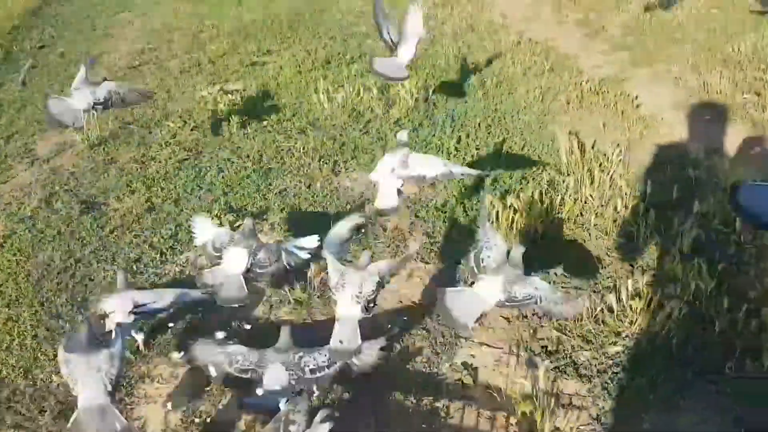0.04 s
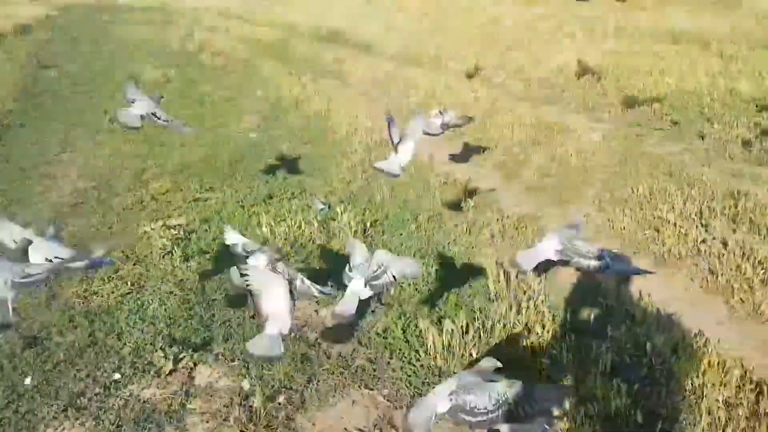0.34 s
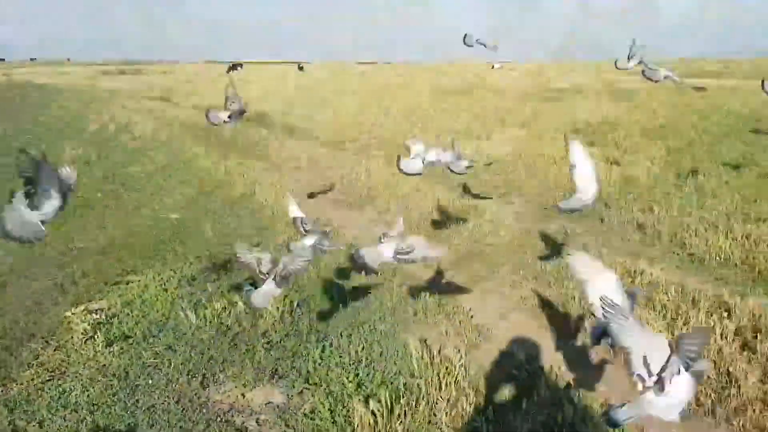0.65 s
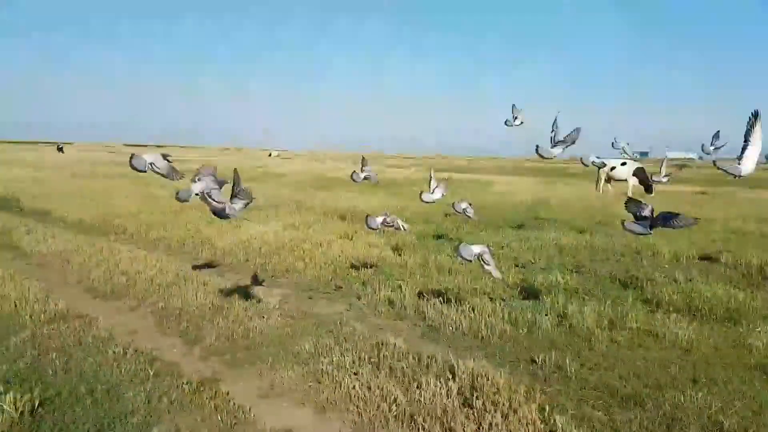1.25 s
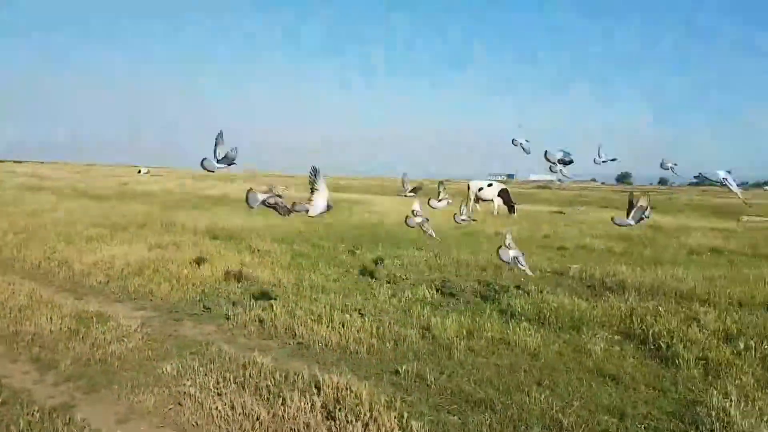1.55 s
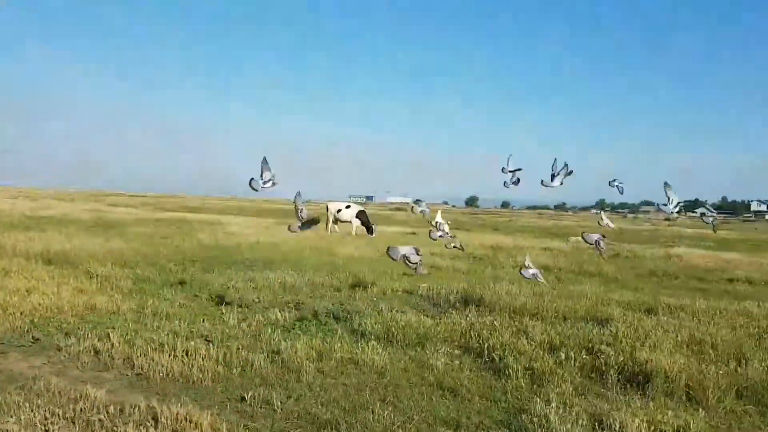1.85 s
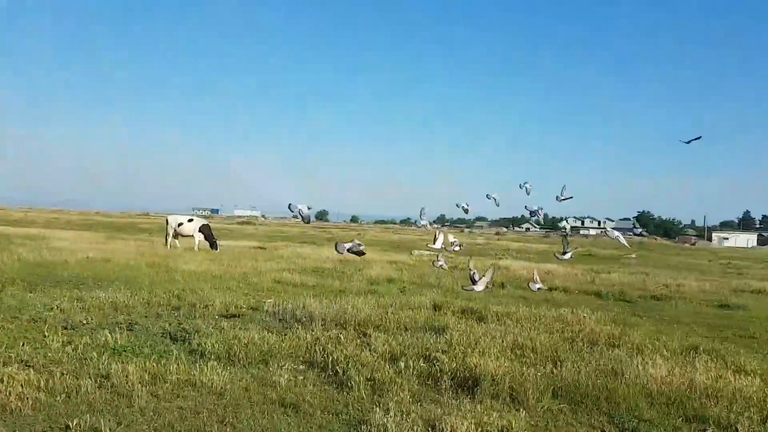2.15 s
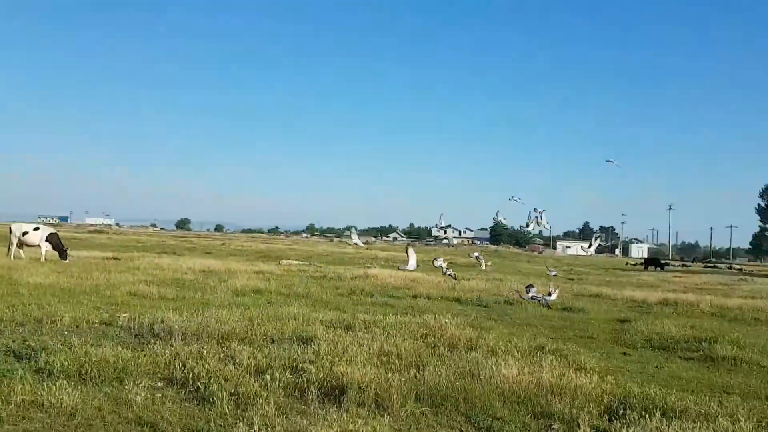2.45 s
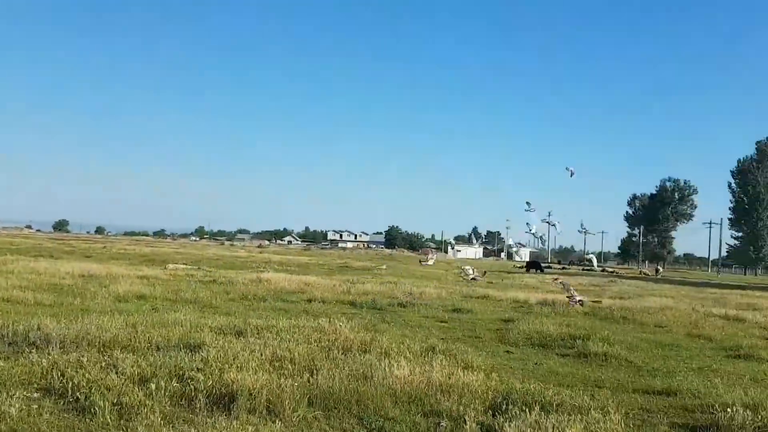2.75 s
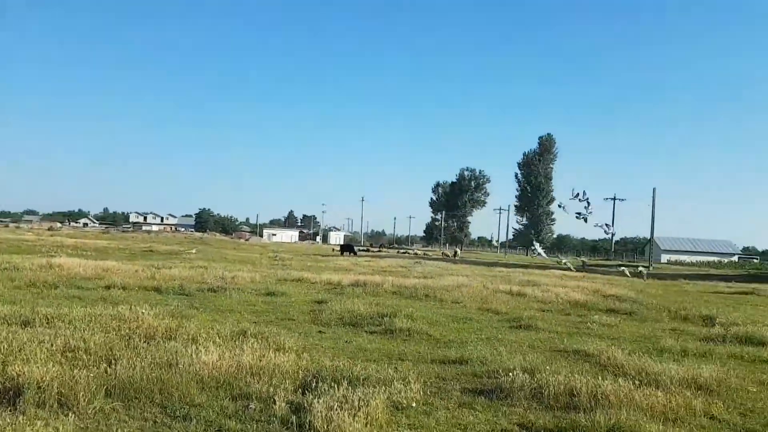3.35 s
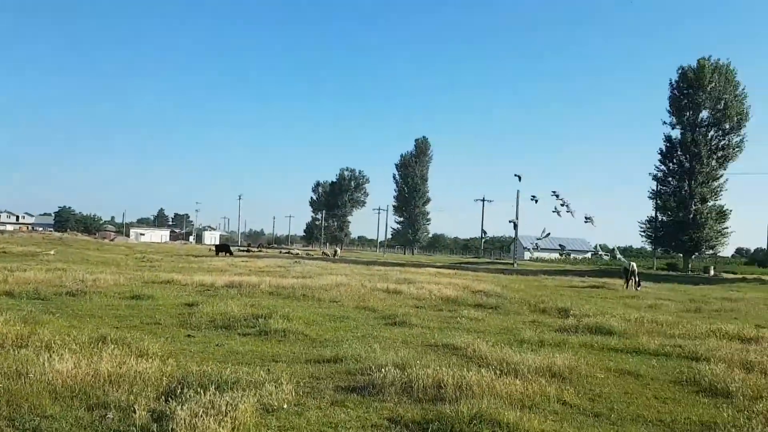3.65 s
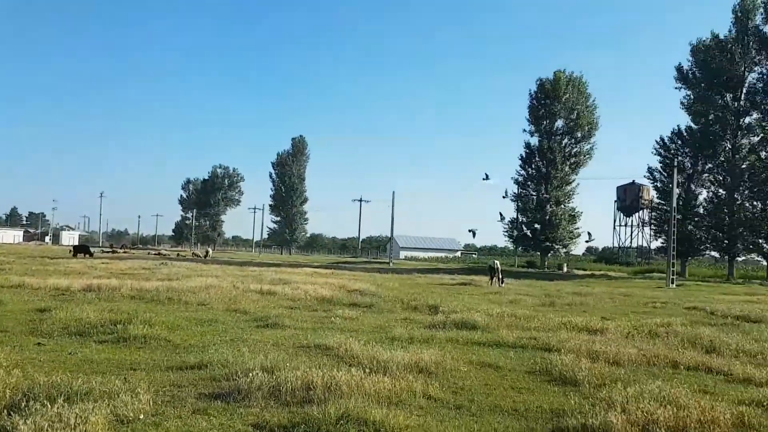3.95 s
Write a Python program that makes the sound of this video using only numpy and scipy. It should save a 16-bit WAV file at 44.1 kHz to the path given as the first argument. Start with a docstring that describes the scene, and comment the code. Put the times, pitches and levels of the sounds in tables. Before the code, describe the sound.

Pigeons burst into flight with loud wing flaps, then fade away over a quiet field.

```python
"""Pigeons taking flight

A flock bursts off the grass close by and flies away over an open field. Colliding wing tips clap,
downstrokes thump the air, and feathers rustle and faintly whistle, all fading with distance.
Light wind, a low rumble and a few far bird calls remain, with faint swishes, a chirp and a dull bump."""
import sys
import numpy as np
from scipy.fft import rfft, irfft, next_fast_len
from scipy.io import wavfile
from scipy.ndimage import uniform_filter1d, map_coordinates

SR = 44100
rng = np.random.default_rng(int(sys.argv[2]) if len(sys.argv) > 2 else 0)


def inscribe(sig):
    """Save sig as 16-bit PCM at rate SR to the path in sys.argv[1].

    A 1-D sig is mono; a 2-D sig holds one channel per row.
    Samples are clipped to [-1, 1] before scaling.
    """
    pcm = np.round(np.clip(np.atleast_2d(sig).T, -1, 1) * 32767)
    wavfile.write(sys.argv[1], SR, pcm.astype(np.int16))


N = 176400

# Spectrum of rubbing feathers. Each row: frequency in Hz, relative level in dB.
FEATHER_SPECTRUM = [(300, -43), (1000, -10.5), (2500, -4), (6500, -4), (8200, -7.5), (9600, -15),
                    (12800, -8), (15500, -19)]
# Coherence of wing noise. Each row: frequency in Hz, left-right correlation.
WING_COHERENCE = [(700, 0.98), (1500, 0.14), (4000, 0.22), (12000, 0)]


def amp(db):
    """Amplitude grows tenfold every 20 dB."""
    return 10 ** (np.asarray(db) / 20)


def unit(x):
    """Normalisation to an rms of 1."""
    return x / np.sqrt(np.mean(x ** 2) + 1e-20)


def along(points, hz):
    """Interpolation of (Hz, value) points on a logarithmic frequency axis."""
    f, v = np.transpose(points)
    return np.interp(np.log(hz + 1), np.log(f + 1), v)


def curves(rows):
    """Linear interpolation in time: one curve for each column after the first."""
    times, *columns = np.transpose(rows)
    return [np.interp(np.arange(N) / SR, times, column) for column in columns]


def wobble(rate):
    """Smooth random modulation: a spline through rate Gaussian knots a second."""
    knots = rng.standard_normal(int(N * rate / SR) + 4)
    return map_coordinates(knots, [np.arange(N) * rate / SR], mode="nearest")


def swell(rise_s, size=4096):
    """A critically damped envelope, peaking at 1 after rise_s."""
    u = np.arange(size) / SR / rise_s
    return u * np.exp(1 - u)


def filtered(x, response):
    """Linear filtering: the spectrum is multiplied by a frequency response."""
    n = x.shape[-1]
    padded = next_fast_len(n + 4096)
    return irfft(rfft(x, padded) * response(np.fft.rfftfreq(padded, 1 / SR)), padded)[..., :n]


def causal(gain):
    """Folding the cepstrum gives the minimum-phase response with this gain."""
    cepstrum = irfft(np.log(np.maximum(gain, 1e-6)))
    half = len(cepstrum) // 2
    cepstrum[1:half] *= 2
    cepstrum[half + 1:] = 0
    return np.exp(rfft(cepstrum))


def band(hz, centre_hz, width):
    """Gain of a steep-sided resonance; width is relative to the centre frequency."""
    return 1 / (1 + ((hz / centre_hz - centre_hz / (hz + 1)) / (2 * width)) ** 2)


def stereo_noise(spectrum, coherence):
    """Partly coherent noise of rms 1: the ratio of mid to side sets the correlation."""
    def response(hz):
        angle = np.arccos(np.clip(along(coherence, hz), -1, 1)) / 2
        return amp(along(spectrum, hz)) * [np.cos(angle), np.sin(angle)]
    mid, side = filtered(rng.standard_normal((2, N)), response)
    return unit(np.array([mid + side, mid - side]))


def add(out, start_s, x):
    """Superposition of x on out from start_s."""
    i = max(0, round(start_s * SR))
    out[..., i:i + x.shape[-1]] += x[..., :max(0, N - i)]


def field():
    """Broadband noise of wind in grass over a distant rumble, most coherent in the bass."""
    # Two spectra. Each row: frequency in Hz, relative level in dB.
    breeze_spectrum = [(120, -45), (200, -1.5), (400, -4.5), (1400, -6.5), (1810, -3), (2470, -10),
                       (6880, -22), (9580, -61), (12600, -30), (16000, -35)]
    rumble_spectrum = [(20, -30), (35, -17), (50, -1), (115, -0.5), (200, -14.5), (1000, -66)]
    # Each row: frequency in Hz, left-right correlation.
    coherence = [(180, 0.92), (550, 0.36), (1650, -0.18)]
    # Each row: time in seconds, gain of the rumble in dB.
    rumble_fade = [(.4, 3), (4, -3)]
    breeze_db, rumble_db = -55, -51.5
    fade_db, = curves(rumble_fade)
    breeze = amp(breeze_db + 0.73 * wobble(3.27)) * stereo_noise(breeze_spectrum, coherence)
    rumble = amp(rumble_db + fade_db + wobble(11)) * stereo_noise(rumble_spectrum, coherence)
    return breeze + rumble


def far_birds():
    """Small birds call across the field: frequency-modulated tones that sink in pitch."""
    # Each row: centre in seconds, level in dB, pitch in Hz, half-width in seconds, relative pitch jitter.
    calls = [(3.025, -63, 5500, .016, .06), (3.702, -56, 4000, .008, .075), (3.78, -64.5, 4100, .009, .02),
             (3.87, -66.5, 2870, .085, .007)]
    sag_per_s = 0.39
    out = np.zeros(N)
    for centre_s, db, pitch_hz, width_s, jitter in calls:
        t = np.arange(N) / SR - centre_s
        hz = pitch_hz * (1 - sag_per_s * t + jitter * wobble(700))
        out += amp(db) * np.exp(-(t / width_s) ** 2 / 2) * np.sin(2 * np.pi * np.cumsum(hz) / SR)
    return out


def far_sounds():
    """Faint bursts of band-limited noise, and a heavily damped low tone heard as one dull bump."""
    # A soft swish around a distant clap, a thin chirp and another soft swish.
    # Each row: centre in seconds, level in dB, half-width in seconds, pitch in Hz.
    bursts = [(2.124, -50, 0.015, 2040), (3.44, -63.5, .04, 3950), (3.685, -53.5, 0.025, 2400)]
    bump_s, bump_db, bump_hz, bump_width_s = 3.3255, -37.5, 120, .005
    t, out = np.arange(N) / SR, np.zeros((2, N))
    for centre_s, db, width_s, pitch_hz in bursts:
        noise = unit(filtered(rng.standard_normal((2, N)), lambda hz: band(hz, pitch_hz, width=0.44)))
        out += amp(db) * np.exp(-((t - centre_s) / width_s) ** 2 / 2) * noise
    bump = np.exp(-np.abs(t - bump_s) / bump_width_s) * np.sin(2 * np.pi * bump_hz * (t - bump_s))
    return out + amp(bump_db) * bump


def whistle():
    """Airflow makes one bird's flight feathers sing two faint, falling partials once a stroke."""
    # Each row: time in seconds, level in dB.
    levels = [(.4, -61), (1.1, -55.5), (1.8, -62.5), (3.2, -70), (4, -80)]
    lower_hz, upper_hz, upper_loss_db_per_s = 6700, 10850, 4
    beat_hz, stroke_at_s, width_s = 8.2, 1.11, .009
    sag_per_s, jitter = 2.6, .019
    level_db, = curves(levels)
    t = np.arange(N) / SR
    from_stroke_s = ((beat_hz * (t - stroke_at_s) + .5) % 1 - .5) / beat_hz

    def partial(hz):
        bend = 1 - sag_per_s * from_stroke_s + jitter * (wobble(1500) + .5 * wobble(8.7))
        return np.sin(2 * np.pi * np.cumsum(hz * bend) / SR)
    gate = np.exp(-((from_stroke_s + .005 * wobble(7.8)) / width_s) ** 2 / 2)
    envelope = amp(level_db + 3.8 * wobble(10.0)) * gate
    return envelope * (partial(lower_hz) + amp(-upper_loss_db_per_s * t) * partial(upper_hz))


def wingbeats(birds=9, beat_hz=8.5, width_s=0.01, scatter_db=3):
    """Incoherent sources add in power: the joint envelope of birds each beating at its own rate."""
    t, power = np.arange(N) / SR, np.zeros(N)
    for _ in range(birds):
        rate_hz = beat_hz * np.exp(0.1032 * rng.standard_normal())
        beats = rate_hz * t + rng.random()
        strength = amp(scatter_db * rng.standard_normal(size=128))[beats.astype(int) % 128]
        from_stroke_s = (beats % 1 - .5) / rate_hz
        power += (strength * np.exp(-(from_stroke_s / width_s) ** 2 / 2)) ** 2
    return unit(np.sqrt(power + 0.14 * power.mean()))


def flock():
    """Strokes push air and rub feathers; the whoosh loses its bass as the birds leave the near field."""
    # Each row: time in seconds, whoosh level in dB, rustle level in dB.
    levels = [(0, -35.5, -42.5), (.13, -32.5, -38.5), (.33, -34, -41), (.8, -39, -45.5), (1.05, -43.5, -48),
              (1.8, -49.5, -56), (2.3, -53, -60.5), (4, -61, -68.5)]
    # The whoosh close by and far off. Each row: frequency in Hz, relative level in dB.
    near_spectrum = [(40, -15), (100, -7), (220, -11.5), (355, 2), (500, -10.5), (850, -2), (1100, -10.5),
                     (3000, -13.5), (8000, -80)]
    far_spectrum = [(60, -27), (200, -14), (380, -5), (780, -1.5), (1100, -8.5), (1800, -9.5),
                    (3000, -17.5), (8000, -58)]
    far_after_s, grain_db, grain_hz = 1.33, 2, 705
    whoosh_db, rustle_db = curves(levels)
    pulsing = np.sqrt(wingbeats())
    far_share = np.clip(np.arange(N) / SR / far_after_s, 0, 1) ** 2
    air = np.sqrt(1 - far_share) * stereo_noise(near_spectrum, WING_COHERENCE)
    air += np.sqrt(far_share) * stereo_noise(far_spectrum, WING_COHERENCE)
    feathers = unit(amp(grain_db * wobble(grain_hz)) * stereo_noise(FEATHER_SPECTRUM, WING_COHERENCE))
    return pulsing * (amp(whoosh_db) * air + amp(rustle_db) * feathers)


def flicks(rise_s=0.0016):
    """Wing tips touch lightly, giving short, dry bursts of rustle."""
    # Each row: start in seconds, level in dB.
    contacts = [(0.095, -32.5), (.137, -32), (0.158, -35), (0.237, -35), (.264, -29.5), (0.35, -30.5),
                (.458, -33), (0.5887, -32.5), (.701, -33.5), (0.8213, -34), (.833, -35), (.9183, -32.5),
                (.932, -33.5), (1.143, -36), (1.174, -38.5), (1.437, -40), (1.446, -41), (1.5, -45),
                (1.875, -46.5), (1.911, -46.5)]
    envelope, shape = np.zeros(N), swell(rise_s)
    for start_s, db in contacts:
        add(envelope, start_s, amp(db) * shape)
    return envelope * stereo_noise(FEATHER_SPECTRUM, WING_COHERENCE)


def puffs(rise_cycles=1.87, turbulence_gain=0.77):
    """A wing displaces a hollow puff of air: a damped tone in turbulence, the lower the longer."""
    # Near downstrokes and distant claps. Each row: start in seconds, level in dB, pitch in Hz.
    downstrokes = [(.062, -26, 863), (.095, -28.5, 361), (.136, -24.5, 886), (.147, -31.5, 310),
                   (.18, -29.5, 370), (.281, -23.5, 450), (.285, -21.5, 1305), (.294, -26, 590),
                   (.308, -29, 890), (.33, -29, 359), (.359, -30.5, 387), (.467, -28, 406),
                   (.472, -29, 1060), (.488, -30, 870), (.525, -35, 309), (.692, -33, 930),
                   (.843, -32, 380), (1.081, -37, 900), (1.513, -35.5, 810)]
    far_claps = [(2.1235, -38.5, 2150), (3.496, -48.5, 1450)]
    out = np.zeros(N)
    for start_s, db, pitch_hz in downstrokes + far_claps:
        shape = swell(rise_cycles / pitch_hz)
        tone = np.sin(2 * np.pi * pitch_hz * np.arange(len(shape)) / SR)
        noise = rng.standard_normal(len(shape))
        turbulence = unit(filtered(noise, lambda hz: band(hz, pitch_hz, width=0.26)))
        puff = shape * (tone + turbulence_gain * turbulence)
        add(out, start_s, amp(db) * puff * np.linalg.norm(shape) / np.linalg.norm(puff))
    return out


def claps(size=4096):
    """Colliding wing tips radiate a pressure impulse amid rattling quills; the ground reflects both."""
    # Each row: start in seconds, then relative levels of snap, rattle and treble in dB.
    impacts = [(0.0074, -5, -21, -11.5), (0.1256, -15, -27, -19), (0.18, -16.5, -29.5, -9.5),
               (0.216, -18, -30, -9), (0.2477, -23, -32, -8), (0.2814, -10, -23, -11),
               (0.3414, -20, -29.5, -7.5), (0.38, -7, -28.5, -13), (0.402, -25, -33, -14.5),
               (0.4713, -25, -27.5, -9), (0.4898, -18, -32, -13), (0.516, -7.5, -27, -9.5),
               (0.6004, -16.5, -31.5, -7.5), (0.747, -14, -32, -8), (0.8493, -34, -30, -9),
               (0.961, -18, -32.5, -10), (1.0646, -17, -34, -13.5), (1.0809, -24.5, -36.5, -5),
               (1.1576, -19, -32.5, -12), (1.2034, -20.5, -34.5, -8.5), (1.2847, -23, -36, -6),
               (1.401, -30, -36, -7), (1.5131, -22.5, -31.5, -12.5), (1.6326, -17, -35.5, -13),
               (1.6693, -19.5, -44, -11), (1.7523, -18, -38.5, -14)]
    # Each row: frequency in Hz, relative level in dB.
    spectrum = [(100, -16), (350, -8.5), (850, -5.5), (1500, -8), (2500, 0), (4000, 0.5), (8000, 7.5),
                (9500, -1.5), (13000, 5), (16000, -6.5)]
    snap_gain_db, snap_s, snap_delay_s = -0.5, .00006, 0.001179  # the slap follows the first touch
    rattle_gain_db, rise_s, fall_s, roughness, coherence = 7.5, 0.00071, 0.0026, 0.42, 0.56
    grass_db, grass_fall_s, ground_db, ground_s = -26.5, 0.0028, -7, 0.0027
    pivot_hz, colour_spread_db, lag_spread_s = 4000, 3, .00005
    out, t, hz = np.zeros((2, N)), np.arange(size) / SR, np.fft.rfftfreq(size, 1 / SR)
    grass_scatter = amp(grass_db) * np.exp(-t / grass_fall_s)
    envelope = (1 - np.exp(-(t / rise_s) ** 2)) * (np.exp(-t / fall_s) + grass_scatter)
    for start_s, snap_db, rattle_db, treble_db in impacts:
        common = np.sqrt(coherence) * rng.standard_normal(size)
        separate = np.sqrt(1 - coherence) * rng.standard_normal((2, size))
        grain = np.exp(roughness * unit(uniform_filter1d(rng.standard_normal(size), size=14)))
        quills = unit((common + separate) * grain)
        u = (t - snap_delay_s) / (snap_s * np.exp(0.23 * rng.standard_normal()))
        impulse = -np.where(u > 0, (1 - u) * np.exp(-np.abs(u)), 0)
        # Every wing rings a little differently.
        tilt_db = .5 * treble_db * np.log2(np.maximum(hz, 1000) / pivot_hz)
        colour_db = colour_spread_db * unit(uniform_filter1d(rng.standard_normal(len(hz)), size=70))
        wing = causal(unit(amp(along(spectrum, hz) + tilt_db + colour_db)))
        snap = irfft(rfft(impulse) * wing)
        snap *= amp(snap_db + snap_gain_db) / np.abs(snap).max()
        rattle = amp(rattle_db + rattle_gain_db) * irfft(rfft(quills * envelope) * wing)
        echo_s = ground_s * np.exp(0.195 * rng.standard_normal())
        ground = 1 + amp(ground_db) * np.exp(-2j * np.pi * hz * echo_s)
        stereo_lag_s = lag_spread_s * rng.standard_normal()
        direction = np.exp(1j * np.pi * np.array([-hz, hz]) * stereo_lag_s)
        add(out, start_s, irfft(rfft(snap + rattle) * ground * direction))
    return out


def from_right(x):
    """Phase and level cues give direction: the treble reaches the right microphone earlier and louder."""
    # Each row: frequency in Hz, phase lead of the right channel in radians.
    phase_lead = [(100, 1), (1400, -0.97), (3400, -0.87), (5000, 1.5), (8000, 5), (16000, 13)]
    # Each row: frequency in Hz, level of right over left in dB.
    balance = [(2000, -0.5), (4500, 10), (8000, 4), (13000, 1)]
    side = np.array([[-.5], [.5]])
    return filtered(x, lambda hz: amp(side * along(balance, hz))
                    * np.exp(1j * side * along(phase_lead, hz)))


def scene():
    """Superposition of the pigeons, a little to the right, and the sounds of the open field."""
    wings = from_right(claps() + flicks() + puffs() + flock())
    return wings + whistle() + field() + far_sounds() + far_birds()


def record(dry):
    """Band limiting: a steep low-pass removes the highest treble."""
    cutoff_hz = 16000
    return filtered(dry, lambda hz: 1 / np.sqrt(1 + (hz / cutoff_hz) ** 160))


dry = scene()
out = record(dry)
inscribe(out)
```